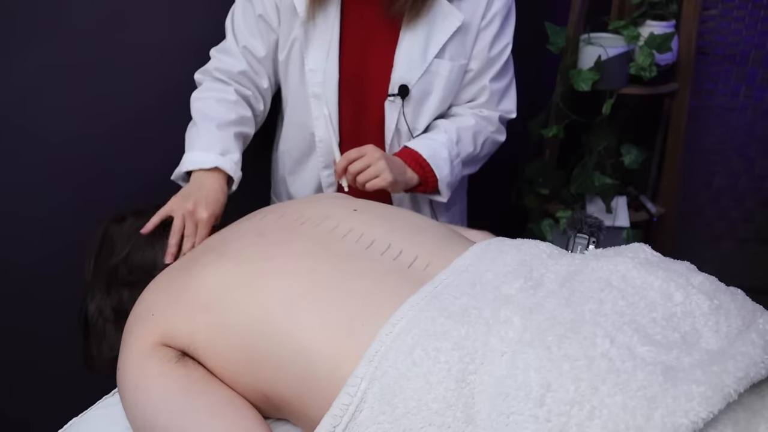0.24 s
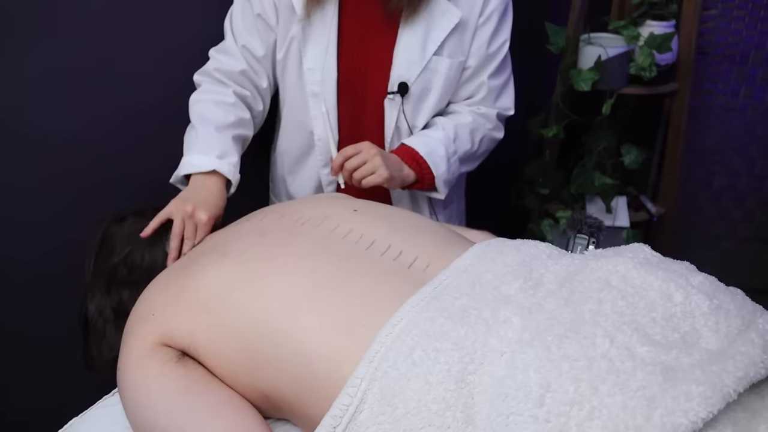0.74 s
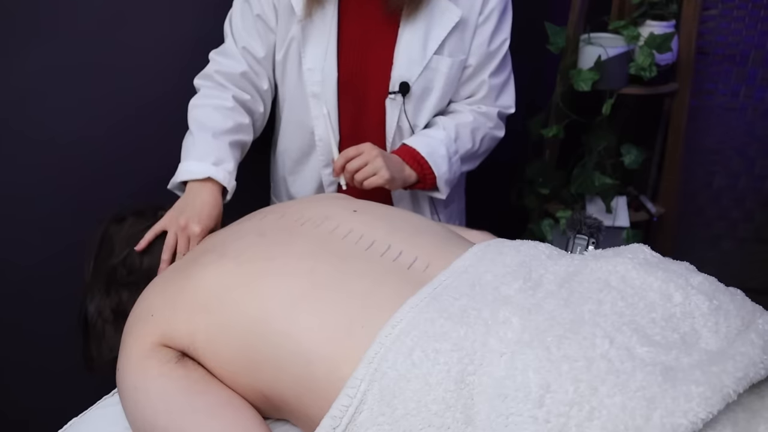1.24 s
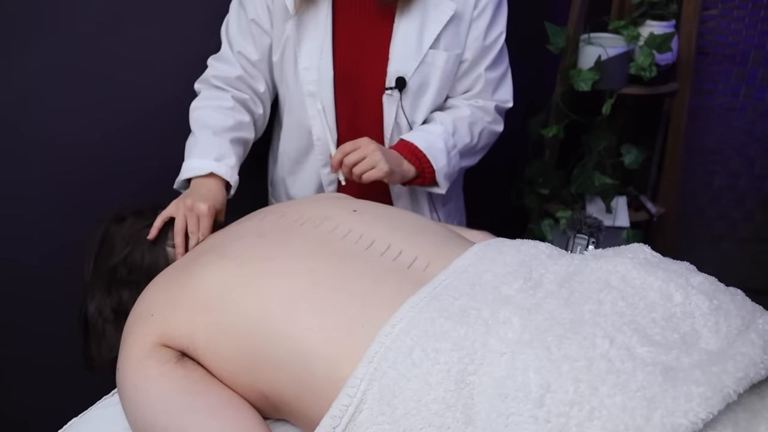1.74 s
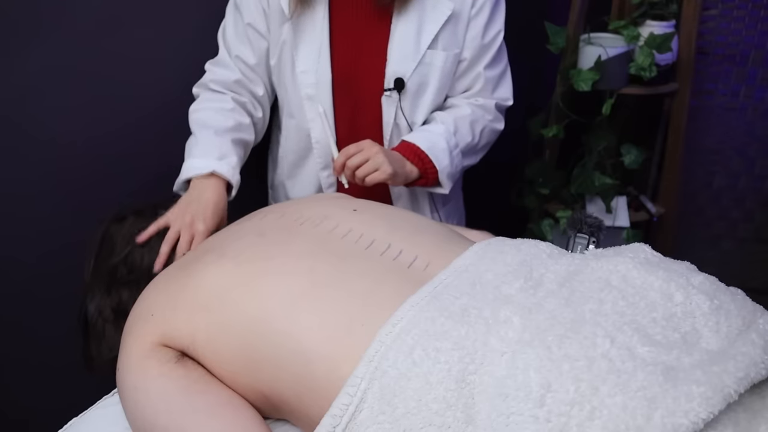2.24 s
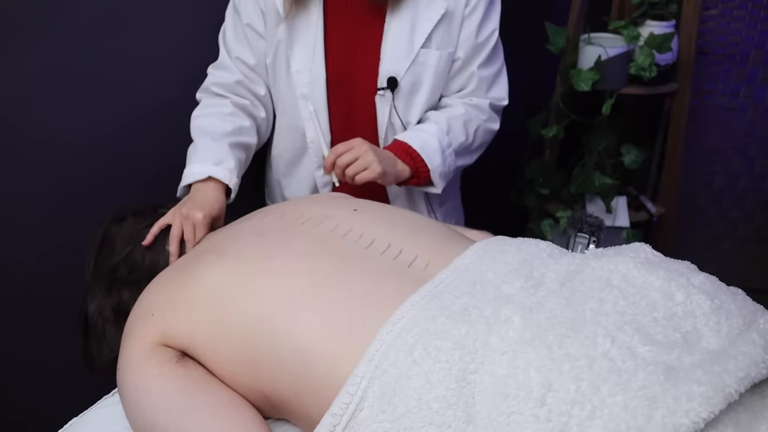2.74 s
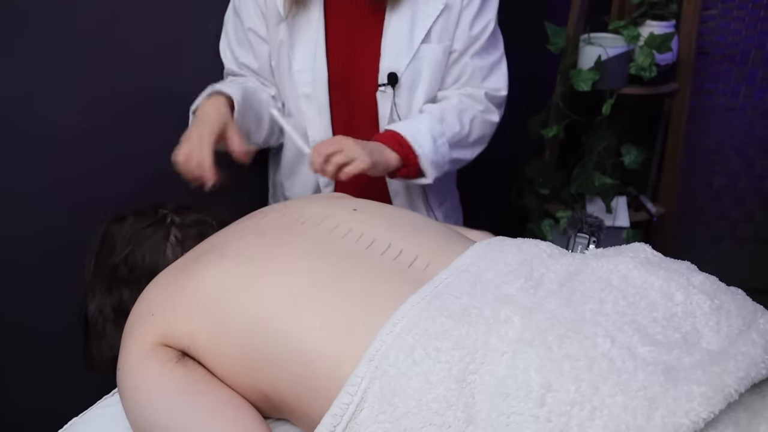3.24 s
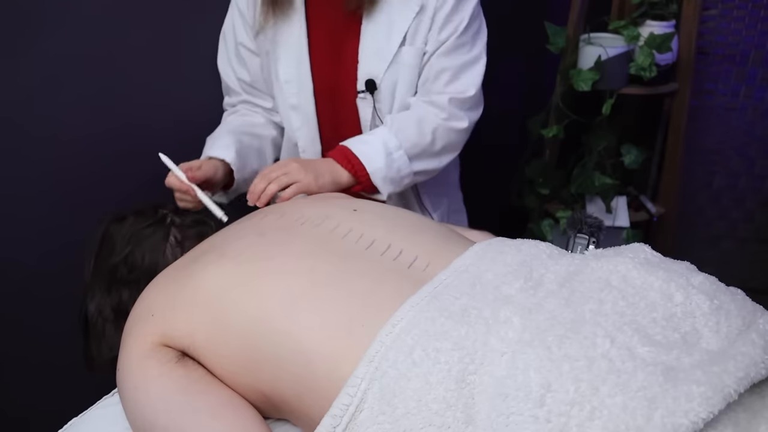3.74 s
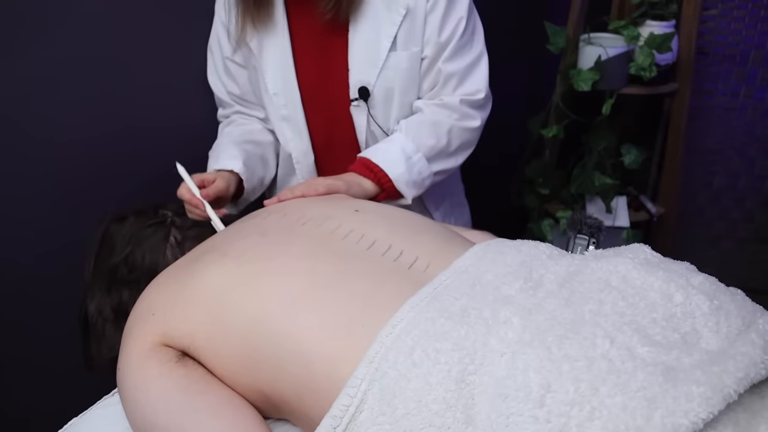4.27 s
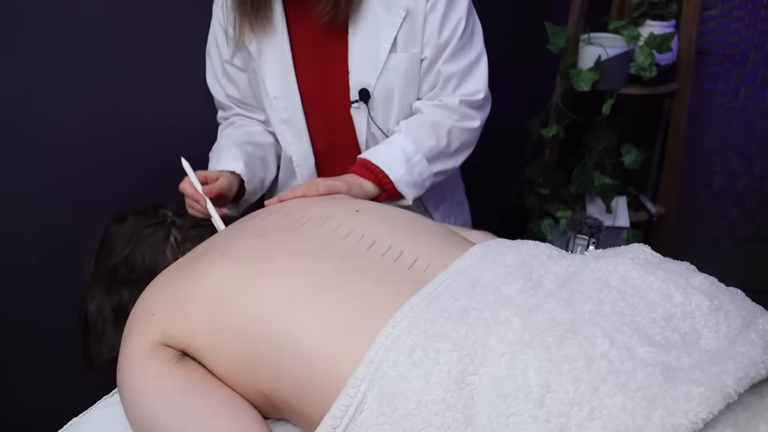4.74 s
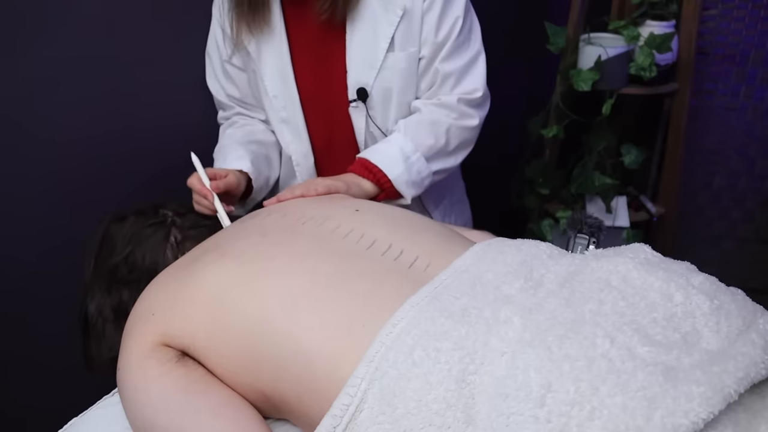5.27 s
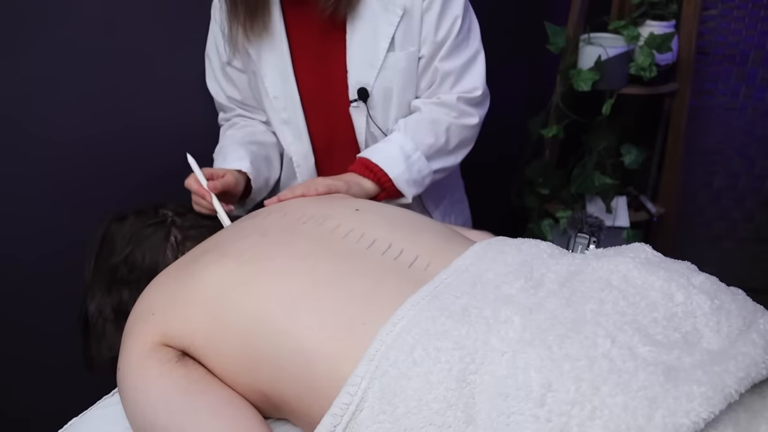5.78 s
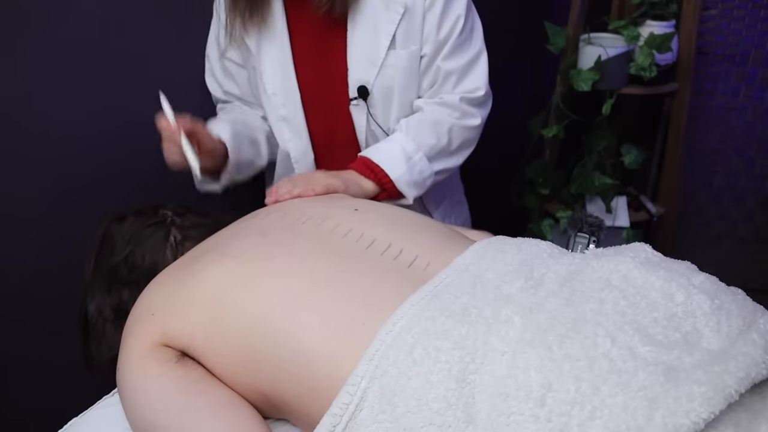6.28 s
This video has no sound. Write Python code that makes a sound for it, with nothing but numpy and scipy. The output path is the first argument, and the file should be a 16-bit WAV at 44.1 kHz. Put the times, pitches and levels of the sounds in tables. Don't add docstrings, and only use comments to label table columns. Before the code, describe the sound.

Soft hair strokes and a brief cloth rustle give way to a run of crisp, bright pen-button clicks over a faint steady hush.

```python
import sys
import numpy as np
from scipy import signal
from scipy.fft import rfft, irfft, next_fast_len
from scipy.io import wavfile
from scipy.ndimage import uniform_filter1d

SR = 44100
rng = np.random.default_rng(int(sys.argv[2]) if len(sys.argv) > 2 else 0)


def amplitude_ratio(level_db):
    exponent = np.asarray(level_db, float) / 20
    return 10 ** exponent


def digitize_waveform(pressure):
    field = np.atleast_2d(pressure).T
    bounded = np.clip(field, -1, 1)
    quanta = np.round(bounded * 32767).astype(np.int16)
    wavfile.write(sys.argv[1], SR, quanta)


N = 287091

# frequency_hz, density_db
HUSH_SPECTRUM = [(20, 14), (150, 8), (250, 9.5), (400, -2), (1000, -4.5), (2000, -27.5), (4000, -18),
                 (10000, -10), (15600, -13), (16000, -64)]
HUSH_DB = -63

# time_s, level_db
SLEEVE_SPEED = [(0.0, -60.5), (.4, -64.5), (.76, -61.5), (1.16, -63.5), (2.82, -64), (3.07, -69.5),
                (3.236, -55), (3.42, -49.5), (3.57, -42), (3.685, -48.5), (3.715, -55.5), (3.9, -56),
                (4.05, -54), (4.2, -49), (4.39, -54.5), (4.61, -65), (6.11, -65), (6.51, -56)]
# frequency_hz, density_db
CLOTH_SPECTRUM = [(150, -26), (250, -9), (526, -2), (626, -3.5), (1050, -5), (1280, -6.5), (2330, -9),
                  (6000, -18.5), (7800, -75.5), (13200, -120)]
# frequency_hz, density_db
DRAG_SPECTRUM = [(24, -32), (40, -6), (102, -0.5), (317, -2), (409, -7.5), (436, -7), (500, -11),
                 (650, -21), (1100, -120)]
SLEEVE_STILL_DB, DRAG_DB, DRAG_EXPONENT = -63, -63, 0.81
# fastest_s, rise_s, fall_s, level_db
WEAVE_SLIDES = [
    (3.38, .2, 0.077, -46.5),
    (3.54, .08, 0.15, -51),
    (4.12, .17, .24, -65),
]
# frequency_hz, density_db
WEAVE_SPECTRUM = [(7500, -47), (9000, -13), (10300, -6), (11500, -18), (13500, -46)]

# fastest_s, rise_s, fall_s, level_db, sheen_over_hair_db
HAND_STROKES = [(.3, 0.31, 0.11, -53.5, -1), (.52, 0.085, 0.083, -54.5, 2.5), (.97, 0.33, 0.11, -54.5, 2),
                (1.17, 0.073, 0.12, -59, 6), (1.5, 0.15, 0.18, -59.5, 1), (1.82, 0.48, 0.41, -58, 3.5),
                (2.2, 0.22, 0.19, -63.5, 1), (2.41, 0.094, 0.15, -59, 8.5), (2.66, 0.059, 0.053, -61.5, -6),
                (2.78, .05, 0.086, -62.5, 1), (2.95, .1, 0.46, -60, 3.5), (3.265, .2, .05, -49, 1),
                (3.35, 0.15, 0.19, -52, 7.5), (3.56, .16, 0.18, -45, 7.5), (3.68, 0.16, .03, -51.5, 4),
                (3.76, 0.092, 0.32, -62.5, 7), (4.17, 0.29, 0.25, -53, 7.5), (4.38, 0.2, .22, -61, 7),
                (4.93, .15, .1, -63, 0), (5.04, 0.034, 0.055, -59.5, 5), (5.38, .05, .1, -61.5, -8),
                (5.6, .15, .2, -71, 0), (6.2, 0.56, .15, -66, -4), (6.5, 0.27, 0.11, -63.5, 7)]
# frequency_hz, density_db
HAIR_SPECTRUM = [(1500, -14), (2500, -11.5), (3200, -6), (4000, -4.5), (5000, -5.5), (6800, -3.5),
                 (9000, -7), (12000, -12.5), (15600, -18), (16000, -70)]
# frequency_hz, density_db
SHEEN_SPECTRUM = [(6500, -39), (8500, -2.5), (10300, 1), (12000, -3), (14000, -11), (15600, -18),
                  (16000, -47)]
STROKE_BEND, RESTING_DB = 0.78, -70

# start_s, peak_db, pitch_hz
STRAND_SLIPS = [(0.1184, -35, 10100), (0.193, -46, 4490), (0.378, -48, 5550), (0.4386, -46, 5650),
                (1.1124, -58.5, 10900), (1.6062, -44, 7140), (1.8846, -43, 7930), (1.9394, -40, 8000),
                (2.0086, -41.5, 9190), (2.08, -34, 7800), (2.1071, -38, 8480), (2.147, -36.5, 8900),
                (2.168, -49, 4280), (2.1854, -37, 7250), (2.21, -57, 6340), (2.2117, -33, 8700),
                (2.2356, -40, 7480), (2.2634, -47, 4110), (2.725, -43.5, 4340), (2.7631, -37, 10900),
                (2.8734, -51, 7880), (2.8908, -46, 5290), (2.9178, -46, 6250), (2.9178, -40, 10700),
                (2.9452, -37, 11300), (2.9754, -45, 7350), (3.019, -35, 11000), (3.0405, -44, 4220)]
# start_s, peak_db, pitch_hz
SOFT_KNOCKS = [(0.117, -38, 180), (0.125, -51, 128), (0.65, -34, 186), (0.968, -42, 191), (1.12, -42, 175),
               (1.38, -48, 88.8), (1.478, -47, 130), (3.294, -25.5, 710), (3.47, -43, 105),
               (3.575, -30.5, 192), (3.605, -28.5, 128), (3.639, -32, 200), (.885, -42, 152),
               (1.68, -41, 220), (4.566, -40, 220), (5.473, -32, 250), (6.076, -32.5, 300),
               (6.37, -36, 150),
               (.105, -40, 600), (.115, -33, 1100), (0.123, -36, 800), (0.129, -34, 1500), (.65, -42, 500),
             (.97, -52, 1800), (1.479, -35.5, 1500), (6.3722, -27, 620), (6.378, -30, 507),
             (4.5555, -31.5, 600), (4.942, -30, 408), (5.4765, -19.5, 1380), (5.791, -23.5, 715),
             (6.08, -23.5, 930)]

# delay_ms, level_db
REFLECTIONS = [(5.6, -24), (7.1, -16.5), (9.4, -14), (12.4, -26), (15.5, -43), (21, -25), (23.5, -43),
               (30, -48), (38, -36)]
# frequency_hz, t60_s
DECAY_TIMES = [(200, 0.16), (2000, 0.33), (6000, 0.27), (14000, 0.17)]
# frequency_hz, level_db
SIDE_SPECTRUM = [(200, -10), (1500, -15.5), (2800, -9.5), (4300, -3.5), (5800, -5), (7500, -1.5),
                 (10000, -1), (13000, 0.5), (15700, -8.5), (16100, -39)]

# centre_hz, width_hz, level_db
BARREL_MODES = [(2280, 840, -0.5), (4700, 2900, 7), (5500, 3280, 4.5), (6330, 1220, -2.5),
                (9730, 1400, -8.5), (12650, 2150, 3), (13900, 2600, -3)]
# start_s, peak_db, high_mode_hz, body_db, body_mode_hz
PRESSES = [(4.3126, -8.5, 9050, -13.5, 5900), (4.4927, -8, 11170, -25, 6200),
           (4.782, -6, 7700, -20.5, 5070), (4.941, -9.5, 10100, -11, 6650),
           (5.254, -11.5, 11570, -12.5, 6430), (5.476, -9, 9600, -17.5, 4350),
           (5.6364, -8, 10500, -12, 4940), (5.7897, -8.5, 11940, -14.5, 5070),
           (5.9367, -10, 7800, -25, 6200), (6.0782, -8, 9600, -14.5, 5120), (6.2367, -9.5, 8960, -12, 5000),
           (6.368, -10.5, 9130, -6, 4600)]
# start_s, peak_db, high_mode_hz, body_db, body_mode_hz
RELEASES = [(4.1629, -18, 9800, -7, 5300), (4.2056, -28.5, 10700, -21, 4220), (4.375, -22, 9150, -3, 2800),
            (4.5545, -12.5, 10050, -3, 4800), (4.8611, -18, 9650, -10, 4120),
            (5.0219, -22, 10500, -14, 6050), (5.3452, -16.5, 9960, -7.5, 4560),
            (5.544, -11, 10100, -8, 6030), (5.7054, -20, 9600, -10.5, 5900),
            (5.8602, -19, 10500, -7.5, 2900), (6.0077, -16, 10200, -5.5, 4150),
            (6.1494, -15.5, 8100, -7.5, 4270), (6.2796, -16.5, 10400, -10, 5040)]
# start_s, peak_db, high_mode_hz, body_db, body_mode_hz
REBOUNDS = [
    (4.4958, -15, 8550, -12.5, 5500),
    (5.939, -18.5, 7800, 18, 4900),
    (6.377, -15.5, 10200, -13, 4500),
]
# start_s, peak_db, pitch_hz
FAINT_TOUCHES = [
    (3.4625, -46, 2770),
    (3.627, -20.5, 4100),
    (3.693, -37, 2230),
    (3.7434, -58, 3180),
    (3.7758, -56, 2380),
    (4.7536, -52, 7170),
    (5.226, -45, 6950),
    (5.2876, -23.5, 9600),
    (5.3163, -36, 4470),
    (5.6043, -38, 2650),
                 (4.4638, -38, 9000), (4.4712, -38, 10000), (4.4849, -34, 9500), (4.5441, -17, 8600),
               (4.5494, -29, 8000), (4.76, -42, 5000), (5.2875, -27, 4500), (5.5275, -25, 9000),
               (5.84, -36, 6000), (6.353, -33, 2300), (6.3543, -35, 4500), (5.288, -34, 2500),
               (5.3165, -29, 9500), (5.528, -32, 4000), (5.605, -42, 5200), (5.2265, -44, 2600),
               (3.6275, -33, 2350)]
PRESS_PUSH_DB, RELEASE_PUSH_DB, REBOUND_PUSH_DB, MOST_PUSH_DB = -41.5, -38.5, -49, -17
SNAP_SIZE, SNAP_LEAD_MS = 1024, 3

# frequency_hz, level_db
MIC_TOP_RESPONSE = [(15500, 0.5), (16300, -5), (17000, -37), (17300, -80)]


def unit(x):
    return x / np.sqrt(np.mean(x ** 2) + 1e-20)


def along(points, hz):
    f, value = np.transpose(points)
    return np.interp(np.log(hz + 1), np.log(f + 1), value)


def filtered(x, response):
    size = next_fast_len(len(x) + 4096)
    return irfft(rfft(x, size) * response(np.fft.rfftfreq(size, 1 / SR)), size)[:len(x)]


def mode(f, hz, width_hz):
    return 1j * f * width_hz / (hz * hz - f * f + 1j * f * width_hz)


def add(track, s, sound):
    part = track[round(s * SR):][:len(sound)]
    part += sound[:len(part)]


def friction_noise(spectrum, patchy_db, grit_db):
    z = signal.stft(rng.standard_normal(N), nperseg=256)[2]
    patches = uniform_filter1d(rng.standard_normal(z.shape), 5, 0)
    patches = uniform_filter1d(patches, 10, 1)
    noise = signal.istft(z * amplitude_ratio(patchy_db * unit(patches)), nperseg=256)[1][:N]
    slips = amplitude_ratio(grit_db * unit(uniform_filter1d(rng.standard_normal(N), 24)))
    return unit(filtered(noise * slips, lambda f: amplitude_ratio(along(spectrum, f))))


def strokes(rows, still_db):
    t = np.arange(N) / SR
    power = amplitude_ratio(still_db) ** 2
    for s, rise_s, fall_s, db in rows:
        speed = np.interp(t, [s - rise_s, s, s + fall_s], [0, 1, 0])
        power = power + (amplitude_ratio(db) * speed ** STROKE_BEND) ** 2
    return np.sqrt(power)


def blip(db, hz, cycles, size):
    t = np.arange(size) / SR
    grain = 0.44 * rng.standard_normal(size) * np.exp(-t / 0.0007)
    envelope = (1 - np.exp(-t * hz * 2)) * np.exp(-t * hz / cycles)
    return amplitude_ratio(db) * envelope * (np.sin(2 * np.pi * hz * t) + grain)


def hush():
    return amplitude_ratio(HUSH_DB) * friction_noise(HUSH_SPECTRUM, patchy_db=0.5, grit_db=4.0)


def sleeve():
    s, db = np.transpose(SLEEVE_SPEED)
    cloth = amplitude_ratio(np.interp(np.arange(N) / SR, s, db))
    drag = amplitude_ratio(DRAG_DB) * (cloth / amplitude_ratio(SLEEVE_STILL_DB)) ** DRAG_EXPONENT
    weave = strokes(WEAVE_SLIDES, -100) * amplitude_ratio(-2.5)
    return (cloth * friction_noise(CLOTH_SPECTRUM, patchy_db=1.2, grit_db=2.5)
            + drag * friction_noise(DRAG_SPECTRUM, patchy_db=1.0, grit_db=0.0)
            + weave * friction_noise(WEAVE_SPECTRUM, patchy_db=0, grit_db=-3))


def hair():
    body = strokes([row[:4] for row in HAND_STROKES], RESTING_DB)
    sheen_rows = [(*times, db + over_db) for *times, db, over_db in HAND_STROKES]
    sheen = strokes(sheen_rows, RESTING_DB + 2)
    return (body * amplitude_ratio(0.9) * friction_noise(HAIR_SPECTRUM, patchy_db=0.9, grit_db=3.0)
            + sheen * amplitude_ratio(-8.5) * friction_noise(SHEEN_SPECTRUM, patchy_db=-0.5, grit_db=3.0))


def fingers():
    track = np.zeros(N)
    for s, db, hz in STRAND_SLIPS:
        add(track, s, blip(db + 6.5, hz, cycles=1.4, size=200))
    for s, db, hz in SOFT_KNOCKS:
        knock = blip(db + 5, hz, cycles=0.52, size=2000)
        add(track, s, filtered(knock, lambda f: 1 / (1 + 1j * f / 1500)))
    return track


def room(direct, sideways):
    t = np.arange(SR // 4) / SR
    scatter = rng.standard_normal(len(t))
    walls = np.zeros(len(t))
    for ms, db in REFLECTIONS:
        late = t - ms / 1000
        walls += amplitude_ratio(db) * (t >= ms / 1000) * np.exp(-np.abs(late) / 0.0006)
    walls = walls * scatter * amplitude_ratio(-13.0)
    clumps = amplitude_ratio(1.9 * unit(uniform_filter1d(scatter, size=180)))
    hz, frames, z = signal.stft(rng.standard_normal(len(t)), SR, nperseg=128)
    decay = amplitude_ratio(-60 * frames / along(DECAY_TIMES, hz)[:, None])
    tail = clumps * signal.istft(z * decay, SR, nperseg=128)[1][:len(t)]
    build_up = np.clip(t / 0.0039, 0, 1) ** 2
    tail = amplitude_ratio(-18) * tail / np.linalg.norm(tail) * build_up
    return np.pad(direct, (0, len(t) - 1)) + signal.fftconvolve(sideways, walls + tail)


def contacts(burst_ms):
    ms = np.arange(SNAP_SIZE) / SR * 1000 - SNAP_LEAD_MS
    scrape = amplitude_ratio(-21) * (ms < 0) * (ms > -1.25)
    bounce = amplitude_ratio(-13) * np.exp(-((ms - burst_ms - 0.7) / 0.4) ** 2)
    window = (ms >= 0) * np.exp(-np.abs(ms / burst_ms) ** 3)
    burst = rng.standard_normal(SNAP_SIZE)
    for _ in range(3):
        steady = burst / np.sqrt(uniform_filter1d(burst ** 2, size=12) + 1e-12)
        z = rfft(window * steady)
        burst = irfft(z / np.sqrt(uniform_filter1d(np.abs(z) ** 2, size=30)), SNAP_SIZE)
    burst = burst * window ** 0.5 * (ms >= 0)
    return burst / np.abs(burst).max() * 2 + (scrape + bounce) * rng.standard_normal(SNAP_SIZE)


def snap(burst_ms, top_db, db, high_hz, thump_db, body_db, body_hz):
    strength = amplitude_ratio(rng.normal(0, 1.5, len(BARREL_MODES)))

    def grip_db(hz):
        return (body_db + 15.5) * (hz < 6500) + top_db * (hz > 11000)

    def barrel(f):
        total = 0
        for k, (hz, width_hz, level_db) in enumerate(BARREL_MODES):
            gain = (-1) ** k * strength[k] * amplitude_ratio(level_db + grip_db(hz))
            total = total + gain * mode(f, hz, width_hz)
        return total

    def picked(f):
        return amplitude_ratio(9) * mode(f, high_hz, 1420) - amplitude_ratio(body_db + 19.5) * mode(f, body_hz, 550)

    def radiated(f):
        thin = (1j * f / (1600 + 1j * f)) ** 2
        return thin * (barrel(f) + picked(f))

    def to_walls(f):
        return amplitude_ratio(along(SIDE_SPECTRUM, f) + 0.45 * grip_db(f)) * (1 + 0.11 * np.abs(picked(f)))

    ring = filtered(contacts(burst_ms), radiated)
    sideways = filtered(np.arange(SNAP_SIZE) == 135, to_walls)
    ms = np.arange(SNAP_SIZE) / SR * 1000 - SNAP_LEAD_MS
    force = np.exp(-((ms - 0.2) / 0.097) ** 2)
    push = filtered(force, lambda f: mode(f, 700, 1800))
    direct = ring / np.abs(ring).max() + amplitude_ratio(thump_db + 9.5) * push / np.abs(push).max()
    sideways = sideways * np.std(direct) / np.std(sideways)
    return amplitude_ratio(db + 4.5) * direct, amplitude_ratio(db + 4.0) * sideways


def pen():
    track = np.zeros(N)
    kinds = [(PRESSES, 1, 1.2, PRESS_PUSH_DB),  # rows, burst_ms, top_db, push_db
             (RELEASES, 0.73, -1.9, RELEASE_PUSH_DB),
             (REBOUNDS, 0.73, -1.9, REBOUND_PUSH_DB)]
    for rows, burst_ms, top_db, push_db in kinds:
        for s, db, high_hz, body_db, body_hz in rows:
            thump_db = min(push_db - db, MOST_PUSH_DB)
            direct, sideways = snap(burst_ms, top_db, db, high_hz, thump_db, body_db, body_hz)
            add(track, s - 0.0019, room(direct, sideways))
    for s, db, hz in FAINT_TOUCHES:
        touch = blip(db + 3, hz, cycles=2, size=400)
        touch = filtered(touch, lambda f: 1j * f / (700 + 1j * f))
        add(track, s, room(touch, touch))
    return track


def scene():
    return (hush() + sleeve() + hair() + fingers() + pen())[None]


def band_limit(x):
    return signal.sosfilt(signal.butter(12, 17000, fs=SR, output="sos"), x)


def record(dry):
    rounded = dry[0] / (1 + np.abs(dry[0] / 0.48) ** 6) ** (1 / 6)
    mix = filtered(rounded, lambda f: amplitude_ratio(along(MIC_TOP_RESPONSE, f)))[None]
    return band_limit(mix)


dry = scene()
out = record(dry)
digitize_waveform(out)
```